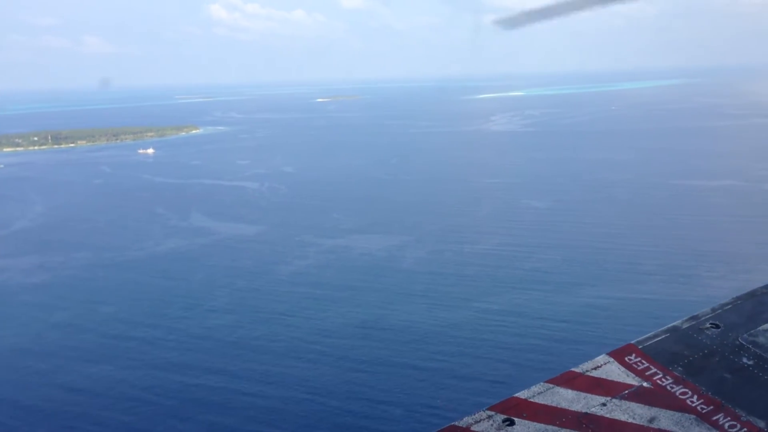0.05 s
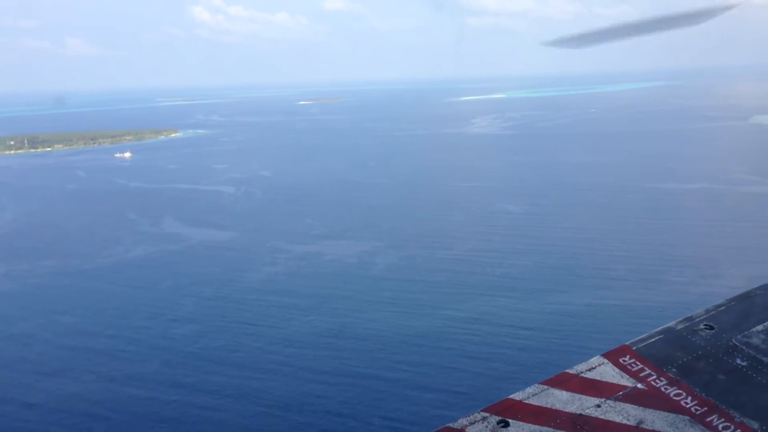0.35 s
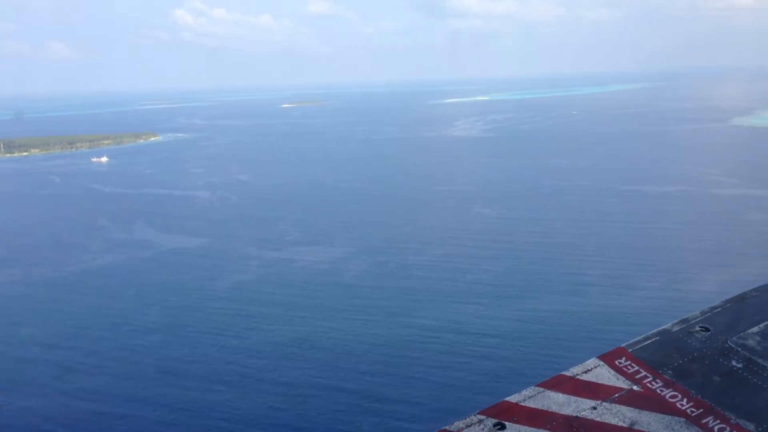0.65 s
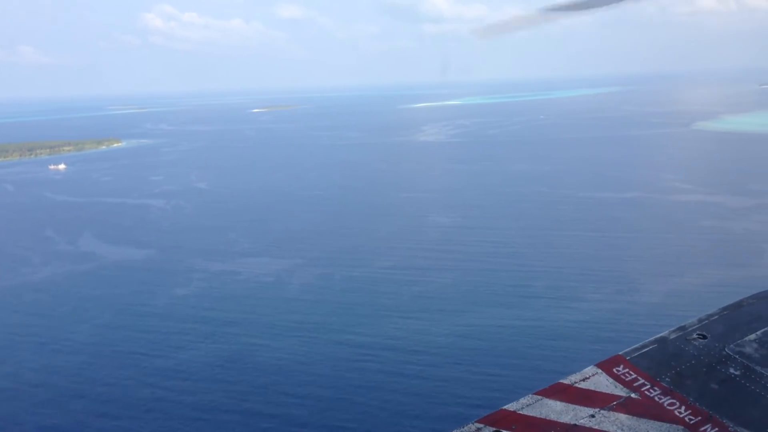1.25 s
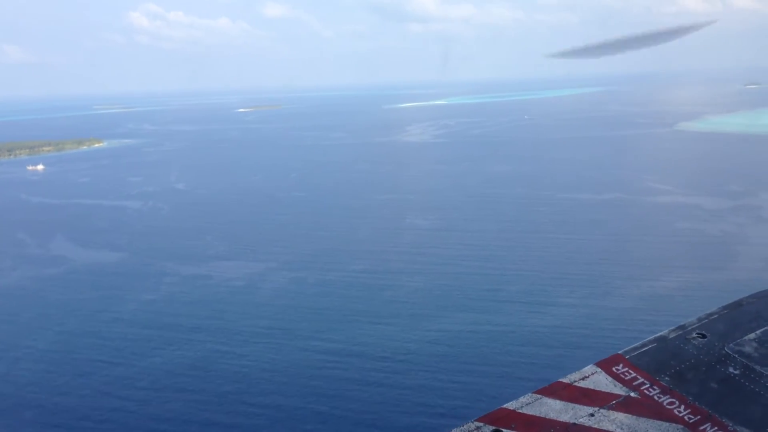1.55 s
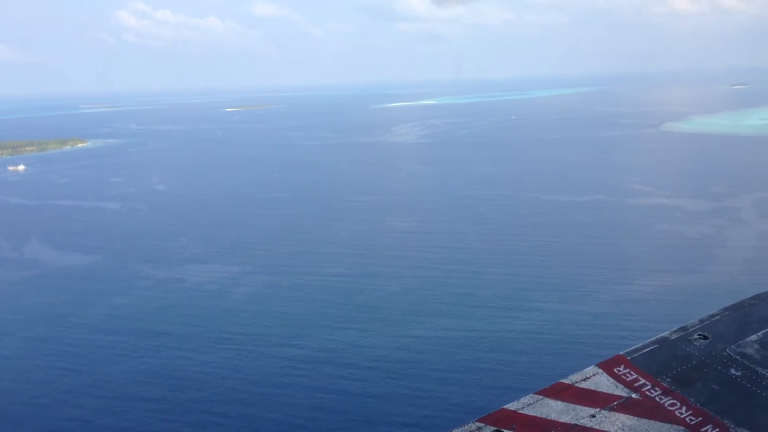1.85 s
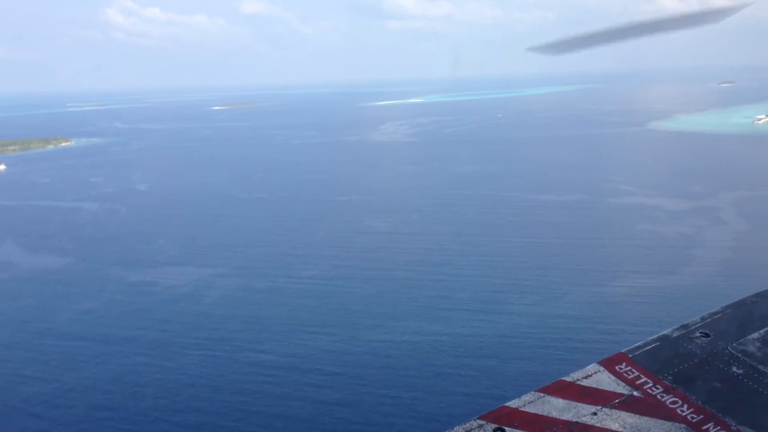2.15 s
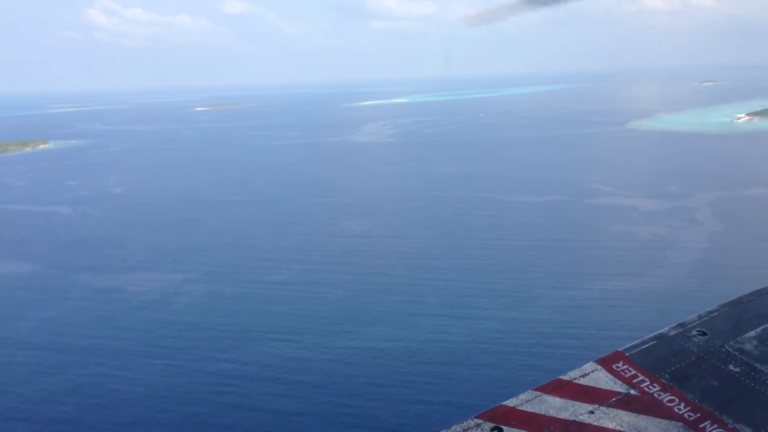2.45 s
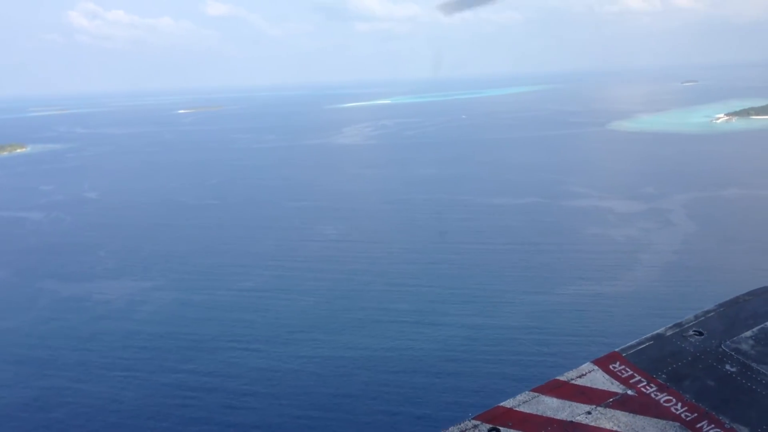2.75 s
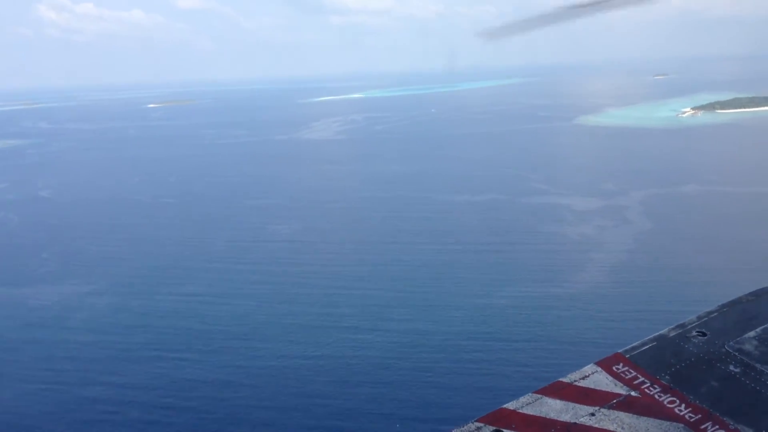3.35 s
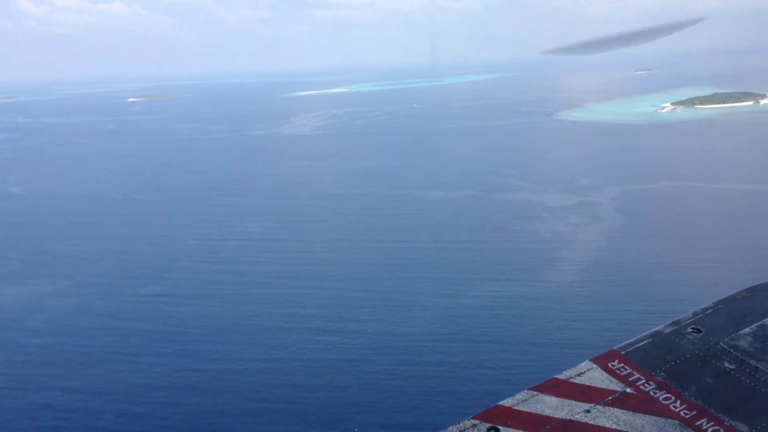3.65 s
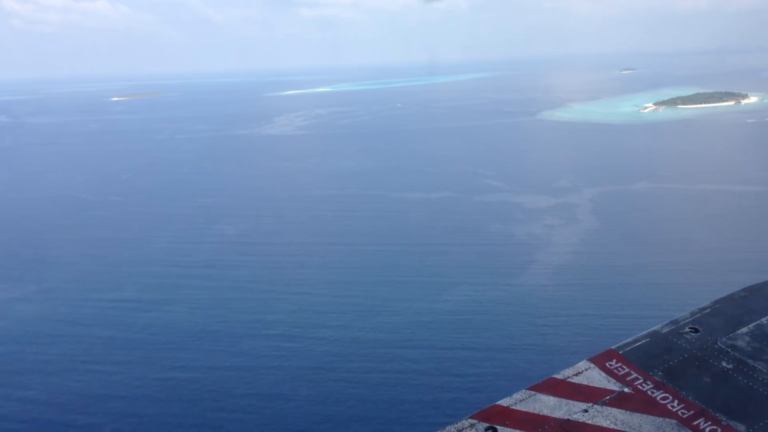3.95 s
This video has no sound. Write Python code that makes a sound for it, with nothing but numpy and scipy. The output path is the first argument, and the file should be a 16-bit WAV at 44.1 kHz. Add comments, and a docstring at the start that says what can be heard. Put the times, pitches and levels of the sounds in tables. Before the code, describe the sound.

A loud, low propeller drone fills the cabin of a small plane in flight, throbbing gently as two propellers drift in and out of step. Mild rushing air and a faint turbine whine run underneath, heard from inside.

```python
"""Inside a small twin-propeller plane

The two propellers turn at slightly different speeds, so their blade tones beat against each other
over rushing air and a thin turbine whine. A limiter turns the sound down when the drone is loud
and back up when the tones cancel, so the hiss swells in the gaps."""
import sys
import numpy as np
from scipy import signal
from scipy.fft import rfft, irfft
from scipy.io import wavfile
from scipy.ndimage import uniform_filter1d, minimum_filter1d

SR = 44100
rng = np.random.default_rng(int(sys.argv[2]) if len(sys.argv) > 2 else 0)


def wav_record(signal):
    """Record a signal, one row per channel, as 16-bit PCM in the file named by sys.argv[1]."""
    frames = np.transpose(np.atleast_2d(signal))
    bounded = np.clip(frames, -1, 1)
    # unit amplitude maps onto the largest positive 16-bit level
    quanta = np.round(bounded * 32767).astype(np.int16)
    wavfile.write(sys.argv[1], SR, quanta)


N = 176400

# Air rushing over the hull: f/Hz, level/dB (in a band 1 Hz wide)
AIR_SPECTRUM = [(15, -60), (36, -48), (50, -54), (75, -49), (165, -46), (260, -53), (350, -52.5),
                (480, -60), (760, -66), (1100, -69), (1700, -74.3), (2700, -77.6), (4200, -77.7),
                (7000, -85.9), (9000, -88), (11200, -92), (12400, -89.6), (15200, -98)]
# How the hiss rises and falls: t/s, level/dB
HISS_SWELLS = [(0, .3), (.42, 1), (.7, -1), (.9, -1.3), (1.08, 2.6), (1.28, 0), (1.53, .8), (1.74, -2),
               (1.98, .6), (2.3, 0), (2.66, -2), (2.95, 1.8), (3.3, -.3), (3.55, -.5), (3.8, 1.2), (4, .8)]
# Narrow bands of turbine noise: f/Hz, width/Hz, level/dB
TURBINE_NOISE = [(2090, 150, -44.7), (3230, 150, -56), (9830, 240, -57)]
# Passing blades: t/s, f/Hz (mean of both propellers), lead of the faster one/blade gaps
BLADE_MOTION = [(0.0, 105.14, -0.343), (0.36, 105.32, -0.004), (0.73, 105.38, 0.305), (1.09, 105.26, 0.583),
                (1.45, 104.97, 0.961), (1.82, 104.69, 1.405), (2.18, 104.23, 1.911), (2.55, 103.63, 2.283),
                (2.91, 102.83, 2.603), (3.27, 102.44, 2.876), (3.64, 102.32, 3.03), (4.0, 101.41, 3.042)]
# Tones at 1, 2, 3... times the blade rate, at cruise: level/dB (faster propeller), level/dB (slower)
BLADE_TONES = [(-16.6, -10.8), (-15.5, -16.7), (-17.4, -25), (-31, -23), (-33, -31.5), (-35, -39),
               (-41.5, -48), (-44, -38.5), (-48, -48), (-49, -47), (-55, -52), (-52, -53), (-54, -57),
               (-58, -58), (-55, -60)]
# The lower tones lie near cabin resonances, so their levels change with the blade rate.
# One row a tone: slope/(dB per Hz) (faster propeller), slope/(dB per Hz) (slower)
TONE_SLOPES = [(-1.9, .9), (.7, .1), (2.3, .9), (1, .6), (1.5, -.2), (.2, .6), (.5, .5), (1.2, 1.6)]
# Tones that the cabin's standing waves flip for the slower propeller: tone number
FLIPPED_TONES = (2, 3, 5, 8)


def undb(db):
    """Decibels to gain."""
    return 10 ** (np.asarray(db) / 20)


def walk(rate):
    """Smooth random motion with a spread of 1; rate (Hz) sets how fast it wanders."""
    count = 1024
    f = np.fft.rfftfreq(count, N / SR / count)
    y = irfft(rfft(rng.standard_normal(count)) * np.exp(-.5 * (f / rate) ** 2), count)
    return np.interp(np.linspace(0, count - 1, N), np.arange(count), y / y.std())


def noise(gain):
    """Noise with the given strength at each frequency (amplitude per root Hz)."""
    return irfft(rfft(rng.standard_normal(N)) * gain, N) * np.sqrt(SR / 2)


def rushing_air(passes):
    """Air flowing over the hull rumbles and hisses; the hiss pulses with each passing blade."""
    split_hz, pulse_depth, gust_db, gust_hz = 700, .18, .35, 9
    f = np.fft.rfftfreq(N, 1 / SR) + 1
    hz, db = np.array(AIR_SPECTRUM).T
    spectrum = undb(np.interp(np.log(f), np.log(hz), db))
    hiss_share = f ** 4 / (f ** 4 + split_hz ** 4)
    hiss = noise(spectrum * np.sqrt(hiss_share))
    hiss *= 1 - pulse_depth * np.sin(2 * np.pi * passes)
    hiss *= undb(np.interp(np.arange(N) / SR, *np.array(HISS_SWELLS).T))
    rumble = noise(spectrum * np.sqrt(1 - hiss_share))
    return (rumble + hiss) * undb(gust_db * walk(gust_hz))


def turbine():
    """The turbine's compressor makes narrow bands of noise and one thin, drifting whine."""
    whine_hz, whine_db, drift = 9834, -63, .0005
    f = np.fft.rfftfreq(N, 1 / SR)
    power = np.zeros_like(f)
    for hz, width, db in TURBINE_NOISE:
        peak = undb(db) ** 2 * 2 / (np.pi * width)
        power += peak / (1 + (2 * (f - hz) / width) ** 2)
    cycles = np.cumsum(whine_hz * (1 + drift * walk(5))) / SR
    whine = undb(whine_db) * np.sqrt(2) * np.sin(2 * np.pi * cycles)
    return noise(np.sqrt(power)) + whine


def shaft_shudder(passes):
    """An unsteady shudder comes once per turn of the propeller."""
    blades, level_db = 3, -37
    waver = 1 + .4 * walk(2)
    return undb(level_db) * np.sqrt(2) * waver * np.sin(2 * np.pi * passes / blades)


def propeller(passes, blade_hz, side):
    """Passing blades make a sawtooth-like wave, shaped by the cabin (side 0 faster, 1 slower)."""
    cruise_hz, waver_hz, resonant_tone = 105, 4, 4
    wave = np.zeros(N)
    for k, levels in enumerate(BLADE_TONES, 1):
        db = levels[side]
        if k <= len(TONE_SLOPES):
            db += TONE_SLOPES[k - 1][side] * (blade_hz - cruise_hz)
        depth = .028 * k ** 1.25  # rough air shakes the higher tones most
        waver = 1 + depth * (walk(waver_hz) + 1j * walk(waver_hz))  # in both level and phase
        waver /= np.sqrt(np.mean(abs(waver) ** 2))
        tone = waver * np.exp(2j * np.pi * k * passes)
        if side == 1 and k in FLIPPED_TONES:
            tone *= -1
        elif side == 1 and k == resonant_tone:
            tone *= -1j  # right on a cabin resonance: a quarter cycle late
        wave -= undb(db) * np.sqrt(2) * tone.imag
    return wave


def scene():
    """Two propellers slip in and out of step over the air and turbine noise."""
    t = np.arange(N) / SR
    times, rates, leads = np.array(BLADE_MOTION).T
    blade_hz = np.interp(t, times, rates)
    passes = np.cumsum(blade_hz) / SR  # how many blades have gone by
    half_lead = np.interp(t, times, leads) / 2
    fast, slow = passes + half_lead, passes - half_lead
    drone = propeller(fast, blade_hz, side=0) + propeller(slow, blade_hz, side=1)
    return (drone + shaft_shudder(fast) + rushing_air(fast) + turbine())[None]


def record(dry):
    """A limiter turns peaks down, waits briefly and turns back up; the highest treble is cut."""
    input_db, ceiling, top_hz = .8, .69, 15300
    lookahead_s, hold_s, release_db_per_s = .004, .065, 55
    x = dry[0] * undb(input_db)
    window, half_hold = int(lookahead_s * SR), int(hold_s * SR / 2)
    needed_db = 20 * np.log10(ceiling / np.maximum(abs(x), ceiling))
    early_db = minimum_filter1d(needed_db, window)  # start just before each peak
    held_db = minimum_filter1d(early_db, 2 * half_hold + 1, origin=half_hold)
    climb_db = release_db_per_s * np.arange(N) / SR
    gain_db = np.minimum.accumulate(held_db - climb_db) + climb_db  # drop fast, climb back slowly
    gain = undb(uniform_filter1d(gain_db, window))
    treble_cut = signal.ellip(10, .1, 80, top_hz, fs=SR, output="sos")
    return signal.sosfilt(treble_cut, x * gain)[None]


dry = scene()
out = record(dry)
wav_record(out)
```